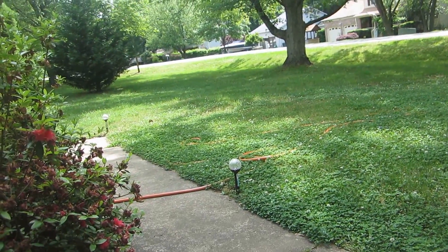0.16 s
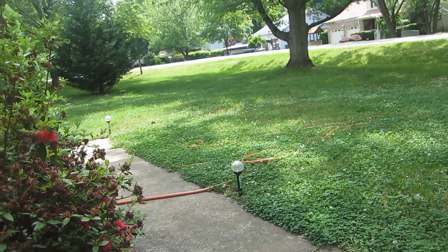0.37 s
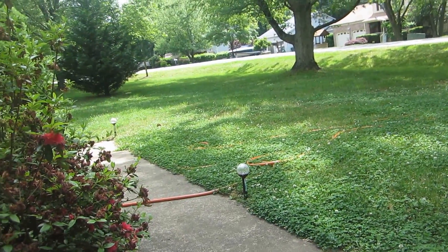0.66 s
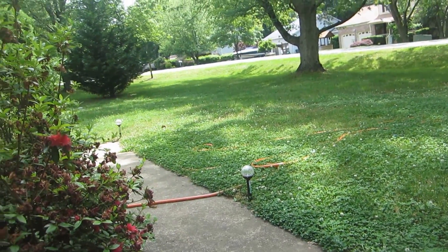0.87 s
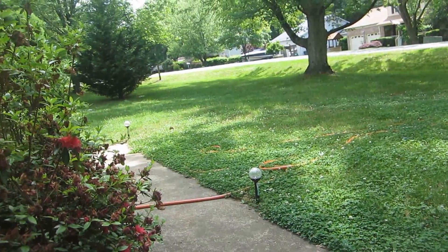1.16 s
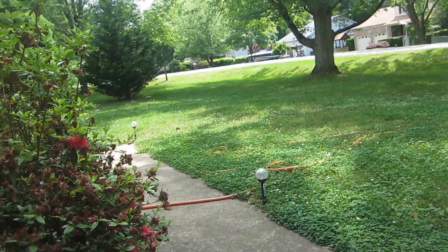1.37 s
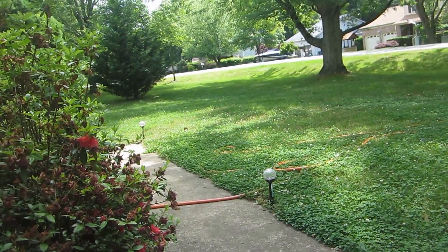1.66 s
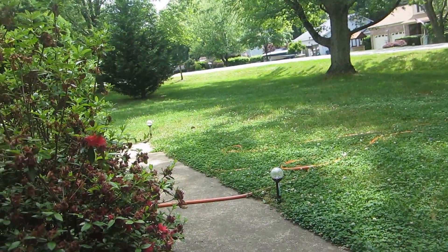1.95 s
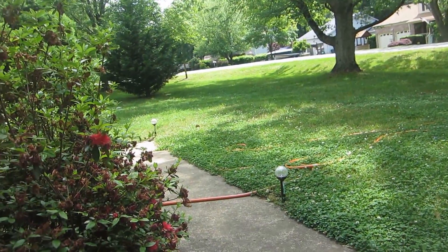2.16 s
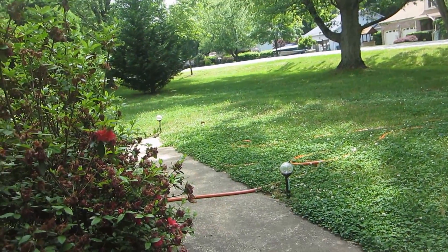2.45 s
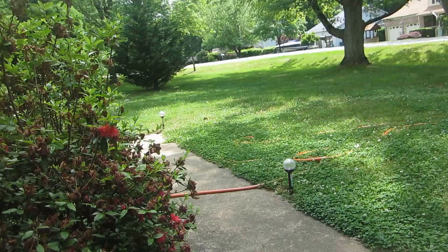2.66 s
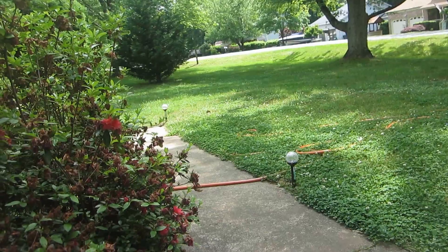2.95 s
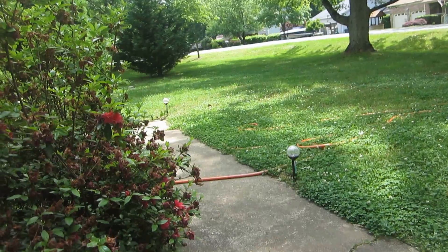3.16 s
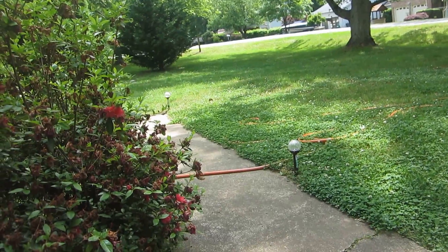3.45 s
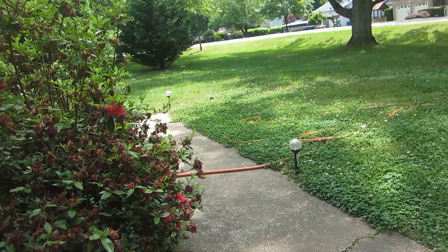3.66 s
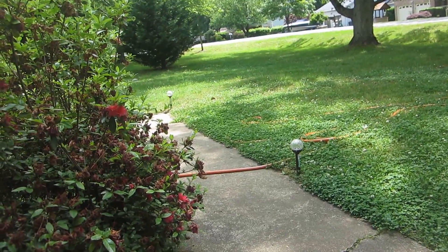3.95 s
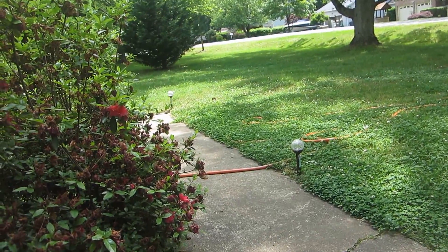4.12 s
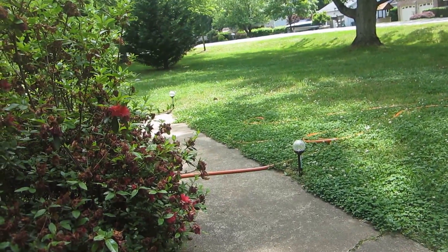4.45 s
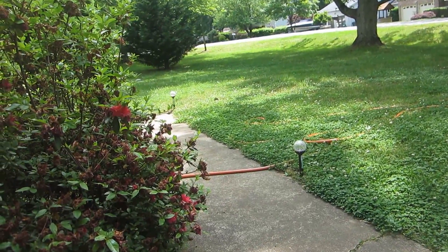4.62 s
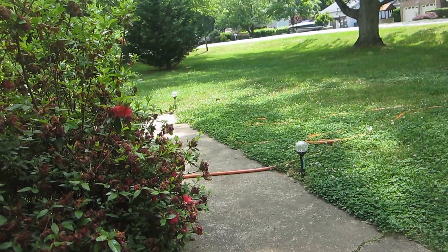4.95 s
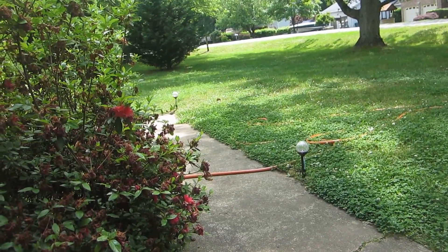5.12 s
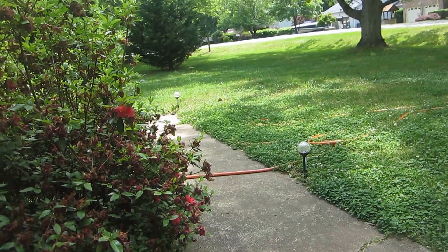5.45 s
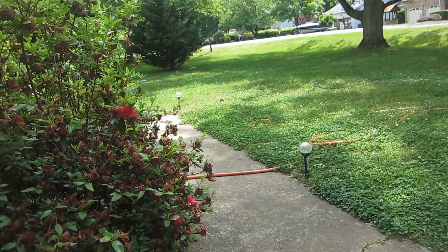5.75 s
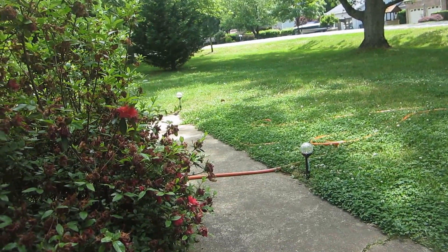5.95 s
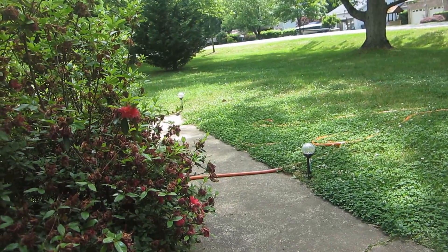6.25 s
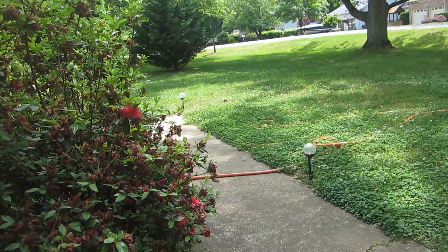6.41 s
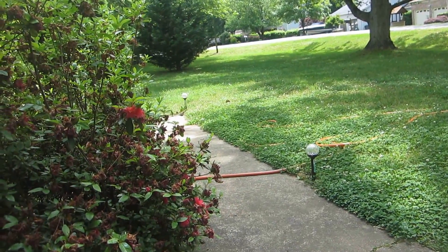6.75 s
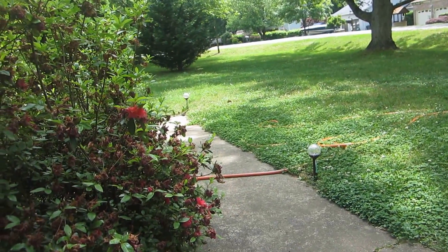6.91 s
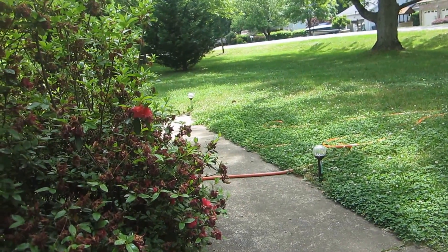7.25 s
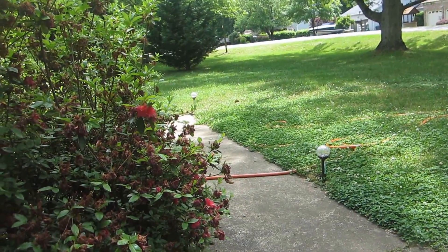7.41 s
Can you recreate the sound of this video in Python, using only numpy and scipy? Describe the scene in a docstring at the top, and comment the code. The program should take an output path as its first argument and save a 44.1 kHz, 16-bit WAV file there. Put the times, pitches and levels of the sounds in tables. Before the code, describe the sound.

Outdoors in a leafy yard, a dense cicada chorus drones throughout, its high buzzing layer gently wavering and easing toward the end. Three bursts of thin, burry chirps come from a small bird close to the microphone, with soft whistles from birds farther off. A distant engine fades into low town rumble and faint leaf hiss, and two tiny dry snaps come from the shrubs late on.

```python
"""Cicadas fill a suburban yard: a low swarm droning in the trees and a high buzzing swarm that swells,
both made of countless tymbal clicks ringing in the insects' bodies. Close to the microphone a small bird
gives runs of high burry chirps; far birds whistle through the trees and two tiny snaps come from the
shrubs. Behind it all are town rumble, a hiss of leaves and the firing tone of an engine drawing away.
One microphone feeds both channels."""
import sys
import numpy as np
from scipy import signal
from scipy.fft import rfft, irfft
from scipy.io import wavfile
from scipy.ndimage import uniform_filter1d

SR = 44100
rng = np.random.default_rng(int(sys.argv[2]) if len(sys.argv) > 2 else 0)


def put_to_file(sound):
    """Save the sound as 16-bit audio at rate SR, in the file named by the first command-line argument."""
    columns = np.atleast_2d(sound).T  # one column per channel
    safe = np.clip(columns, -1, 1)
    whole_steps = np.round(safe * 32767)
    wavfile.write(sys.argv[1], SR, whole_steps.astype(np.int16))


N = 334278
T = np.arange(N) / SR


def undb(db):
    return 10 ** (np.asarray(db) / 20)


def unit(x):
    return x / np.sqrt(np.mean(np.abs(x) ** 2))


def curves(table):
    """Each column after the first, interpolated over time."""
    times, *columns = np.transpose(table)
    return [np.interp(T, times, column) for column in columns]


def ring(x, hz, width_hz):
    """A resonance passed twice, so its skirts fall steeply."""
    b, a = signal.iirpeak(hz, hz / width_hz, SR)
    return signal.lfilter(b, a, signal.lfilter(b, a, x))


def coloured(spectrum):
    """Noise of rms 1 with the given spectral shape."""
    hz, db = np.transpose(spectrum)
    bin_hz = np.maximum(np.arange(N // 2 + 1) * SR / N, 1)
    gain = undb(np.interp(np.log(bin_hz), np.log(hz), db))
    return unit(irfft(rfft(rng.standard_normal(N)) * gain, N))


def walk(rate):
    """Random levels held 1 / rate s and smoothed twice; rms 1."""
    hold = int(SR / rate)
    steps = np.repeat(rng.standard_normal(N // hold + 1), hold)
    return unit(uniform_filter1d(uniform_filter1d(steps, hold), hold)[:N])


def smear(rows, size):
    """Complex noise of rms 1, smoothed over size samples; multiplied on a tone it widens the line."""
    real, imag = rng.standard_normal((2, rows, 4096))
    return unit(uniform_filter1d(uniform_filter1d(real + 1j * imag, size), size))


def note(length, edge):
    """Share of the note elapsed and a rounded envelope."""
    elapsed = np.linspace(0, 1, int(length * SR))
    return elapsed, np.sin(np.pi * elapsed) ** edge


def add(out, start, x):
    i = int(start * SR)
    out[i:i + len(x)] += x[:N - i]


def tree_echoes(x, t60_s, db):
    """Scattered echoes from trunks and walls blur each note and trail after it."""
    t = T[:SR // 4]
    tail = rng.standard_normal(len(t)) * np.exp(-np.log(1000) * t / t60_s)
    return x + undb(db) * signal.fftconvolve(x, tail / np.linalg.norm(tail))[:N]


def swarm(levels, modes, clicks_per_s, flicker_db, flicker_rate):
    """Countless tymbal clicks; insects of each size ring their own mode and waver on their own."""
    lead_s_per_octave, lead_max_s = 1.1, 0.14  # in a swell high voices come in first, low ones linger
    level_db, out = curves(levels)[0], 0
    mean_db = level_db.mean()
    for hz, width_hz, db, share in modes:
        clicks = (rng.random(N) < clicks_per_s / SR) * rng.standard_normal(N)
        lead_s = np.clip(lead_s_per_octave * np.log2(hz / modes[0][0]), -lead_max_s, lead_max_s)
        swell_db = np.interp(T + lead_s, T, level_db) - mean_db
        waver_db = share * swell_db - (level_db - mean_db) + flicker_db * walk(flicker_rate)
        out = out + undb(db + waver_db) * ring(clicks, hz, width_hz)
    return undb(level_db) * unit(out)


def droning_cicadas():
    """The low swarm up in the trees: its clicks merge into a nearly steady drone."""
    # loudness at the microphone: (time [s], level [dB])
    levels = [(0, -25), (2.7, -24.5), (3.2, -26), (4.3, -25.5), (7.58, -25.5)]
    # body resonances: (frequency [Hz], width [Hz], gain [dB], share of the swell followed [ratio])
    modes = [(1305.2, 133, 4, 1), (1196, 184, -6, 0.92), (1430, 139, -9.5, 1), (1038, 283, -16.5, 0.42),
             (872.5, 147, -16, 0.21), (2560, 500, -31, 1)]
    return swarm(levels, modes, clicks_per_s=4000, flicker_db=0.18, flicker_rate=6.6)


def buzzing_cicadas():
    """The high swarm: denser clicks ring broad modes in a buzz that swells and sinks."""
    # loudness at the microphone: (time [s], level [dB])
    levels = [(0, -32), (.5, -35.5), (1.2, -31), (1.8, -32), (2.4, -32), (3.2, -38.5), (3.75, -35),
              (4.7, -34.5), (5.1, -36.5), (5.8, -34), (6.2, -35.5), (6.5, -37.5), (6.9, -40.5),
              (7.3, -39.5), (7.58, -38)]
    # body resonances: (frequency [Hz], width [Hz], gain [dB], share of the swell followed [ratio])
    modes = [(5797, 970, 2, 0.83), (5180, 1230, -1.5, 0.83), (6430, 510, -6.5, 1.6),
             (4034, 1000, -5.5, 0.67), (8000, 3200, -15.5, 0.79)]
    return swarm(levels, modes, clicks_per_s=20000, flicker_db=0.68, flicker_rate=4.6)


def town_rumble():
    """Low noise from the town beyond the yard, rising a little near the end."""
    # loudness at the microphone: (time [s], level [dB])
    levels = [(0, -43), (6.2, -43.5), (7.58, -41.5)]
    # rumble spectrum: (frequency [Hz], relative density [dB])
    spectrum = [(12, -25), (22, -8), (32, -4), (50, -1.5), (62, -6.5), (95, 0.5), (150, -5.5), (250, -12),
                (400, -19.5), (750, -21.5), (1100, -56)]
    return undb(curves(levels)[0]) * coloured(spectrum)


def leaves():
    """Leaves and far air: a soft, broad hiss that wavers and slowly fades."""
    # hiss spectrum: (frequency [Hz], relative density [dB])
    spectrum = [(200, -19), (500, -0.5), (2000, -2.5), (3100, -4.5), (7000, -9.5), (10000, -9),
                (13000, -16), (15600, -38)]
    start_db, fade_db_per_s = -44, 0.18
    return undb(start_db - fade_db_per_s * T + .5 * walk(2.985)) * coloured(spectrum)


def distant_engine():
    """A wavering firing tone with weak lines above it, over a low roar that fades with distance."""
    # engine drawing away: (time [s], firing tone [Hz], tone level [dB])
    firing = [(.05, 127, -44.5), (.3, 128.4, -39.5), (1.4, 127.6, -43), (2.2, 122.3, -49),
              (2.9, 121.2, -42.5), (3.4, 121, -55), (4.1, 121, -45.5), (4.7, 120.3, -52),
              (7.58, 117.6, -51.5)]
    # lines above the firing tone: (frequency multiple [ratio], relative level [dB])
    overtones = [(1.5, -11.5), (2.4, -22), (2.8, -17.5)]
    # roar spectrum: (frequency [Hz], relative density [dB])
    spectrum = [(60, -30), (100, 1), (130, -2.5), (190, 2), (240, -8), (340, -9), (420, -19), (800, -42)]
    roar_db, fade_db_per_s = -42.5, 1
    hz, tone_db = curves(firing)
    phase = 2 * np.pi * np.cumsum(hz * (1 + 0.00806 * walk(12))) / SR
    lines = np.sin(phase) + sum(undb(db) * np.sin(k * phase) for k, db in overtones)
    tone = np.sqrt(2) * undb(tone_db + 3.7 * walk(7)) * lines
    return tone + undb(roar_db - fade_db_per_s * T) * coloured(spectrum)


def far_birds():
    """Whistled near-sines that flutter and blur on the long way through the trees."""
    # gliding whistles: (start [s], length [s], first pitch [Hz], last pitch [Hz], level [dB])
    glides = [(.632, .03, 4250, 3800, -43), (.652, .03, 3840, 3650, -35), (.64, 0.029, 3280, 3600, -44),
              (1.0, .03, 2750, 3150, -50), (5.6, .28, 9300, 10200, -59), (6.123, .09, 2710, 2430, -51)]
    # one bird repeating a rising call: (start [s], level [dB])
    risers = [(.155, -48), (.445, -53), (0.723, -53), (1.248, -49)]
    riser_s, riser_first_hz, riser_last_hz = .04, 2340, 2820
    # whistles on one pitch: (start [s], length [s], pitch [Hz], level [dB])
    held = [(2.853, .2, 2450, -59), (3.91, 0.092, 2484, -54), (4.03, 0.16, 2465, -49),
            (4.37, .08, 2420, -51.5), (4.493, .055, 2440, -46), (4.56, .33, 2445, -58),
            (4.9, 0.51, 2420, -57), (5.549, 0.12, 10850, -58.5)]
    calls = glides + [(start, riser_s, riser_first_hz, riser_last_hz, db) for start, db in risers]
    calls += [(start, length, hz, hz, db) for start, length, hz, db in held]
    out, drift_hz = np.zeros(N), 8 * walk(50)
    for start, length, first_hz, last_hz, db in calls:
        elapsed, envelope = note(length, edge=0.1)
        hz = first_hz + (last_hz - first_hz) * elapsed + drift_hz[int(start * SR):][:len(elapsed)]
        add(out, start, np.sqrt(2) * undb(db) * envelope * np.sin(2 * np.pi * np.cumsum(hz) / SR))
    flutter = undb(1.8 * walk(30))
    return tree_echoes(out * flutter, t60_s=.15, db=-13)


def near_bird():
    """Arched, shaky chirps close by; a throb adds sidebands, mostly above; note ends rasp most."""
    # chirps: (start [s], length [s], first pitch [Hz], top pitch [Hz], level [dB], sideband gain [dB])
    chirps = [(0.735, 0.048, 8100, 8300, -42.5, -9), (0.825, .05, 8100, 8150, -40, -9),
              (.925, .051, 7000, 8200, -40, -8), (1.03, .045, 6900, 7400, -41, -10),
              (1.12, .045, 7300, 7750, -42, -10), (1.212, .04, 7000, 7500, -42, -7),
              (1.305, .037, 7200, 7400, -41, -7), (1.421, 0.027, 6900, 7100, -45, -10),
              (1.49, .035, 7000, 7200, -42, -12), (1.588, .055, 7200, 7700, -40.5, -9),
              (1.702, .073, 7500, 8000, -38.5, -9), (1.835, .085, 7300, 8180, -37.5, -9),
              (1.96, .085, 7700, 8470, -35, -11), (2.108, 0.068, 7900, 8440, -36.5, -13),
              (2.21, .07, 7000, 8470, -37, -11), (2.33, 0.066, 7600, 8470, -37, -13),
              (2.438, .055, 7400, 8100, -44, -8), (4.015, .043, 8200, 8600, -44.5, -1),
              (4.107, .06, 8000, 8900, -44.5, 2.5), (4.22, 0.064, 7900, 8650, -37.5, -5.5),
              (4.33, .052, 7200, 8500, -38.5, -9), (4.432, .035, 7300, 8340, -38, -12),
              (4.522, .028, 7500, 7800, -40, -12), (4.6, .035, 7300, 7800, -48, -5),
              (5.982, .055, 7800, 8430, -41, -2.5), (6.088, 0.071, 7800, 8900, -43, -5),
              (6.216, .05, 6700, 8700, -43.5, -4), (6.327, 0.054, 6500, 8700, -46.5, -4),
              (6.43, 0.03, 7100, 7500, -41, -5), (6.525, .03, 6700, 7000, -44, -8)]
    top_at = .62  # share of the note elapsed at the top of its arch
    throb_hz, fall_hz_per_s = 531, 6000  # a note sags from its top by this rate times its length
    rough_at_8_khz, rough_per_khz_lower, rough_per_khz_leap = .45, .45, .25
    out = np.zeros(N)
    k = np.arange(-1, 4)[:, None]  # sideband number; 0 is the main tone
    for start, length, first_hz, top_hz, db, side_db in chirps:
        elapsed, envelope = note(length, edge=.5)
        n, rising = len(elapsed), elapsed < top_at
        last_hz = top_hz - fall_hz_per_s * length
        droop = np.where(rising, 1 - elapsed / top_at, (elapsed - top_at) / (1 - top_at)) ** 1.7
        arch_hz = top_hz - (top_hz - np.where(rising, first_hz, last_hz)) * droop
        # low notes and wide leaps rasp more
        lower_khz, leap_khz = (8000 - top_hz) / 1000, (top_hz - first_hz) / 1000
        rough = rough_at_8_khz + rough_per_khz_lower * lower_khz + rough_per_khz_leap * leap_khz
        rasp = np.clip(rough ** 2 + .4 * droop, 0, 1)
        hz = arch_hz + 400 * rough * smear(rows=1, size=200).real[0, :n]
        phase = 2 * np.pi * np.cumsum(hz + k * throb_hz * hz / top_hz, axis=1) / SR
        gains = undb(np.where(k == 0, 0, side_db - 3.6 * (abs(k) - 1) - 2.5 * (k < 0)))
        wobble = np.sqrt(1 - rasp) + np.sqrt(rasp) * smear(rows=len(k), size=45)[:, :n]
        # sidebands come and go in patches
        patches = np.where(k == 0, 1, np.abs(smear(rows=len(k), size=500)[:, :n]))
        lines = np.exp(1j * phase) + undb(-28) * np.exp(1.5j * phase)  # each has a faint fifth above
        tone = (gains * wobble * patches * lines).real.sum(axis=0)
        effort = 0.75 + 0.42 * elapsed
        add(out, start, np.sqrt(2) * undb(db) * envelope * effort * tone)
    return tree_echoes(out, t60_s=.15, db=-10)


def shrub_snaps():
    """Tiny dry snaps in the shrubs, each a high ring that dies at once."""
    # snaps: (time [s], peak level [dB], pitch [Hz])
    snaps = [(5.694, -36, 9800), (7.129, -35, 9940)]
    decay_s = .0015
    out, t = np.zeros(N), T[:400]
    for start, db, hz in snaps:
        add(out, start, undb(db) * np.exp(-t / decay_s) * np.sin(2 * np.pi * hz * t))
    return out


def scene():
    """The whole yard at one microphone, sent to both channels."""
    cicadas = droning_cicadas() + buzzing_cicadas()
    background = town_rumble() + leaves() + distant_engine()
    mono = cicadas + background + near_bird() + far_birds() + shrub_snaps()
    return np.array([mono, mono])


def record(dry):
    """The recorder cuts the top treble steeply."""
    top_hz = 15730
    return signal.sosfilt(signal.ellip(16, .2, 70, top_hz, fs=SR, output="sos"), dry)


dry = scene()
out = record(dry)
put_to_file(out)
```